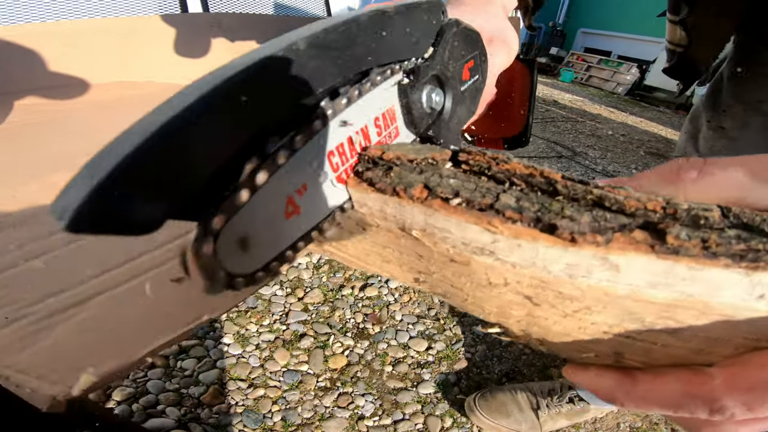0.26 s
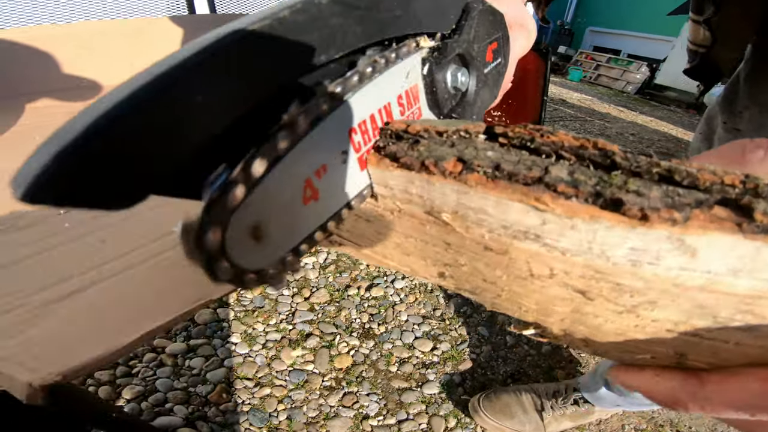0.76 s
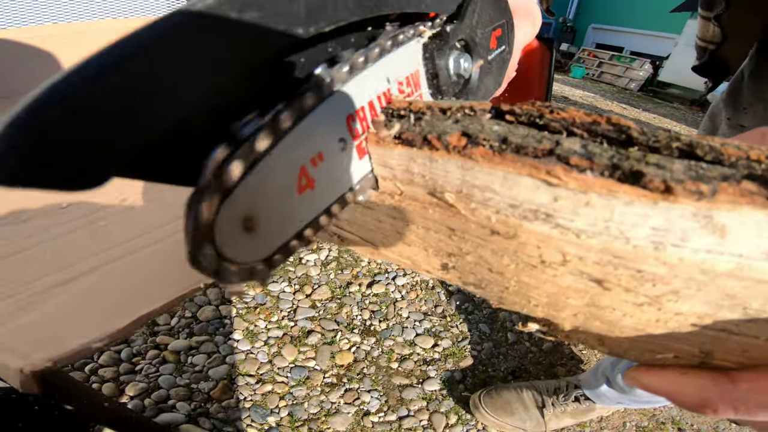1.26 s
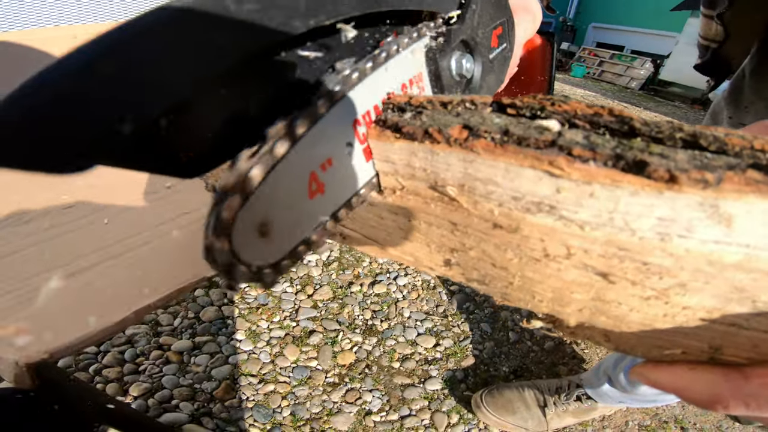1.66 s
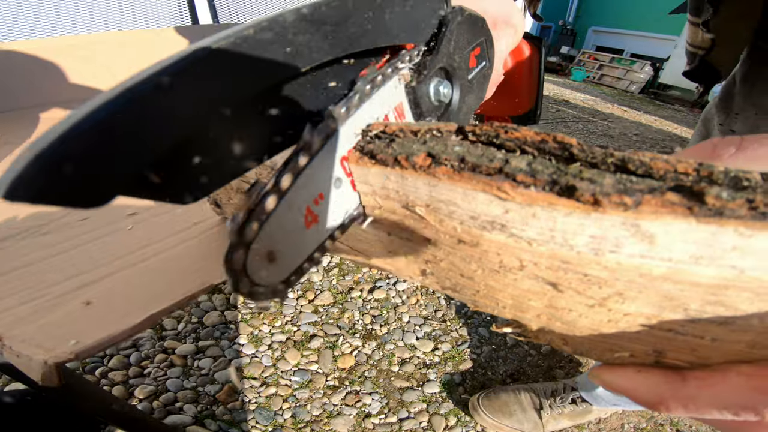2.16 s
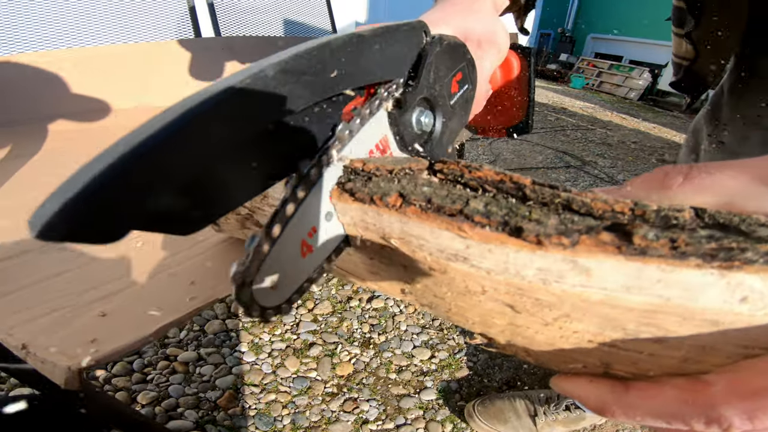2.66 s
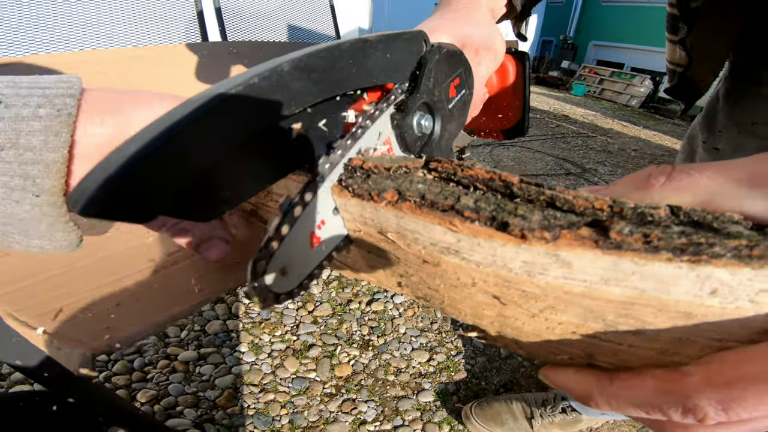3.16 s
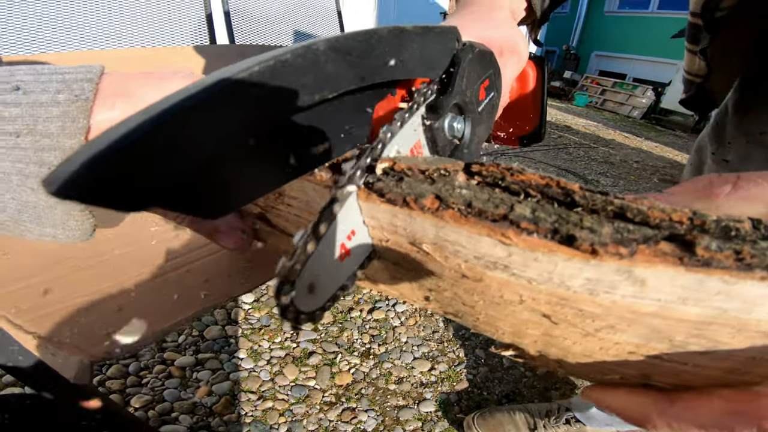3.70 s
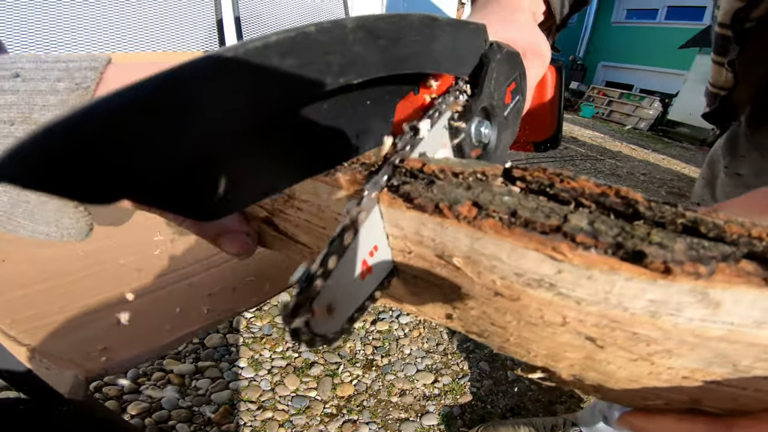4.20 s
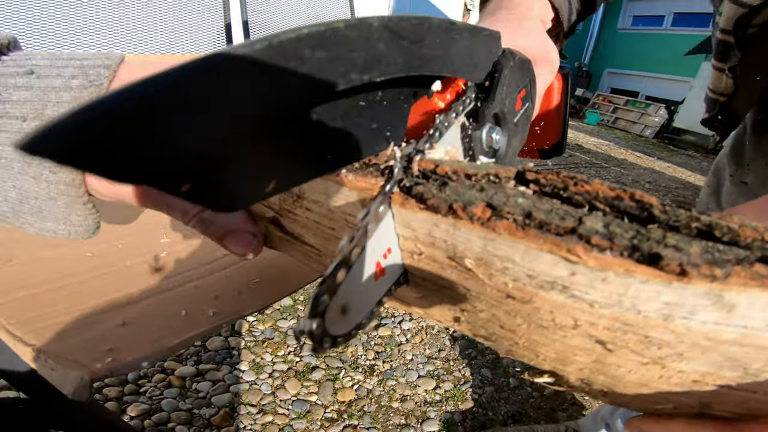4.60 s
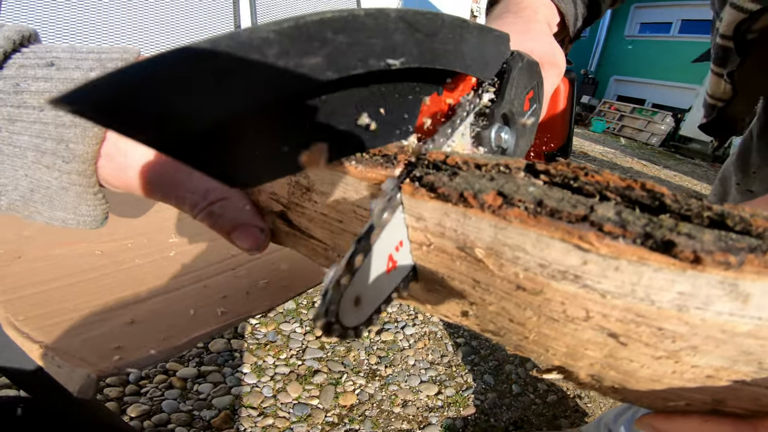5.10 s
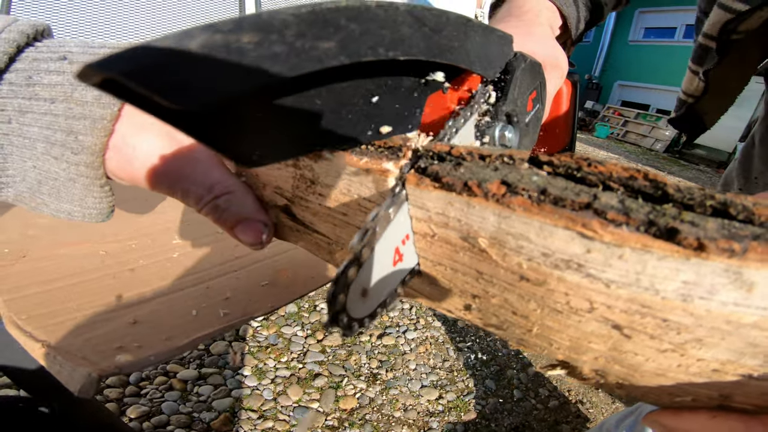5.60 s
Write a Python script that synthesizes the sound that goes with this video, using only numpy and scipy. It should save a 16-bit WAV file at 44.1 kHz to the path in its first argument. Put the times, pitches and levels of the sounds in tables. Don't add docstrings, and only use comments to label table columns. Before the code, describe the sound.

A small battery chainsaw chews steadily through a hand-held log outdoors, rough buzzing rasp and fuzzy whine, very close and dry.

```python
import sys
import numpy as np
from scipy import signal
from scipy.fft import rfft, irfft, next_fast_len
from scipy.io import wavfile
from scipy.ndimage import uniform_filter1d, minimum_filter1d, map_coordinates

SR = 44100
rng = np.random.default_rng(int(sys.argv[2]) if len(sys.argv) > 2 else 0)


def to_wav(sig):
    pcm = np.clip(np.atleast_2d(sig), -1, 1) * 32767
    pcm = np.round(pcm).astype(np.int16)
    wavfile.write(sys.argv[1], SR, pcm.T)


def ratio_of_db(decibels):
    return 10 ** (np.asarray(decibels, float) / 20)


N = 257984
CUTTERS_HZ = 43

# time_s, lead_cutters
CHAIN_LEAD = [(0, 0.75), (0.1, 0.15), (0.35, 1.05), (0.45, 0.65), (1.1, -0.35), (1.25, -1.2), (1.95, -2.0),
              (2.25, -0.85), (2.85, -1.35), (3.35, -3.05), (3.8, -2.5), (4.25, -3.25), (4.75, -2.6),
              (4.95, -3.35), (5.15, -2.4), (5.35, -2.65), (5.7, -2.2), (5.85, -1.45)]
# onset_s (each peaks about 3 ms later), level_db, ring_hz
HARD_BITES = [(0.0553, -8, 2070), (0.114, -16, 2620), (0.1531, -6, 2460), (0.1984, -2, 2820),
              (0.2413, -14, 2450), (0.2809, -18, 2760), (0.3217, -8, 1950), (0.3721, -15, 2090),
              (0.4226, -17, 2720), (0.5759, -7, 2440), (0.6354, -5, 2430), (0.81, -13, 2680),
              (0.831, -3, 2470), (1.3321, -20, 2400), (2.394, -2, 2410), (2.4628, -4, 1980),
              (2.511, -4.5, 2130), (2.5386, -3, 2160), (2.5834, -3, 2060), (2.6282, -4, 2070),
              (2.7274, -4.5, 2510), (2.7923, -1, 2420), (3.0225, -2, 2380), (3.1697, -3, 2440),
              (3.196, -4, 2380), (3.2235, -9, 2370), (3.503, -7, 2080), (4.3505, 0, 2240),
              (5.1711, -1, 2430), (5.263, -3, 2270)]
# time_s, push_db
BAR_PUSH = [(0, 0.5), (.4, 1.5), (.65, 2), (.9, 0.5), (1.25, -2), (1.6, 0), (2, 0.5), (2.4, -1),
            (2.62, -4.5), (2.9, 0), (3.5, -0.5), (4.24, 1), (4.44, -0.5), (4.9, 1), (5.24, -2), (5.45, 0.5),
            (5.85, -1.5)]
# deep_db, shallow_change_db, per_push_db, settle_s
LAYER_LEVELS = [
    (-31.5, 5, .5, 2.25),
    (-33, 5, 0.37, 1.77),
    (-22, 4, 1, 0.49),
    (-29, -4, 0.35, 4.9),
]
# pitch_hz, density_db
TEAR_COLOURS = [
    [(880, -22), (1500, -23), (1870, -6), (2250, -10), (2390, -6), (2820, -4.5), (3310, -10), (3670, -17.5), (4110, -32), (4400, -37), (5720, -27), (9680, -120)],
    [(880, -50.5), (1500, -21), (1760, -9), (1990, 1), (2410, -3.5), (2540, -3.5), (2840, -5.5), (3310, -8), (3790, -8), (4060, -13.5), (4400, -39.5), (5720, -74), (9680, -120)],
]
# time_s, pitch_hz, share_of_tearing_db
GEAR_WHINE = [(0, 2470, -12), (1.5, 2530, -21), (2.3, 2520, -8.5), (2.6, 2420, -9), (2.75, 2500, -6),
              (3, 2420, -15), (3.4, 2420, -12), (3.65, 2500, -4.5), (3.85, 2330, -3), (4.12, 2320, -6),
              (4.3, 2520, -7), (4.5, 2650, -17), (4.78, 2580, -9), (5.03, 2670, -9.5), (5.25, 2450, -8.5),
              (5.45, 2525, -6), (5.62, 2440, -7), (5.85, 2500, -2.5)]
# pitch_hz, density_db
FIZZ_COLOURS = [
    [(2470, -3.5), (4200, -9.5), (4640, -7), (4920, -1.5), (5800, -22.5), (6660, -7.5), (7030, -8), (8020, -9), (8850, -21), (9300, -14), (10300, -17), (12900, -16.5), (15600, -29)],
    [(2470, -9), (4200, -6.5), (4490, -9), (5400, -5), (6060, -7), (7150, -1.5), (8150, -11), (8660, -7), (9000, -4.5), (9560, -10), (10800, -25), (12400, -19), (15600, -35)],
]
# pitch_hz, density_db
LOG_COLOUR = [(180, -25), (300, -4), (350, -9.5), (426, 1.5), (476, 0.5), (609, -9), (653, -9), (720, 1.5),
              (772, 2), (1040, -6), (1600, -7), (2080, -27), (3520, -120)]
# pitch_hz, density_db
THUMP_COLOURS = [
    [(32, -37), (55, -6.5), (194, 1), (253, -1), (314, -17.5), (350, -8.5), (460, -52), (770, -120)],
    [(26, -42), (45, -8), (59, -2), (86, 0), (113, -3), (199, -4.5), (350, -19.5), (460, -49), (770, -120)],
]
# centre_s, half_length_s, extra_db
LOG_JOLTS = [(0.047, 0.13, 5.5), (0.627, 0.081, 4), (0.944, 0.11, 6.5), (2.4, 0.097, 2.5),
             (3.05, 0.09, 1.5), (4.002, 0.17, 0.5), (5.225, 0.19, 1)]
# pitch_hz, saw_near_db, saw_leaning_away_db
STEREO_WIDTH = [(40, -15, -5.5), (336, -17, -16.5), (860, -12.5, -9.5), (1120, -8.5, -4.5),
                (1720, -5.5, -4), (1930, -4.5, -12.5), (2310, -13.5, -21), (2950, -13.5, -10.5),
                (4250, -13.5, -13), (5600, -4, -7), (7050, 0, 1.5), (9200, 0, -5), (10600, -1.5, -3),
                (15000, 0, -7)]
# pitch_hz, share_of_side_tied_to_mid (0-1), phase_rad, opening_s
MIC_PORTS = [(80, .6, 3.1, .9), (350, .5, 2.7, .7), (700, .25, 3.5, .6), (1300, .3, .7, .5),
             (2100, .7, .3, .3), (3000, .65, 0, .7), (4000, .6, 0, .5), (5000, .25, .5, .4),
             (7000, .7, 1.7, .15), (8000, .55, 1.3, .15), (10000, .5, 1.7, .2), (12500, .6, .4, .2)]


def unit(x):
    return x / np.sqrt(np.mean(x ** 2) + 1e-20)


def along(points, hz):
    f, *cols = np.transpose(points)
    return np.squeeze([np.interp(np.log(hz + 1), np.log(f + 1), c) for c in cols])


def curves(rows):
    s, *cols = np.transpose(rows)
    return [np.interp(np.arange(N) / SR, s, c) for c in cols]


def wobble(rate):
    knots = rng.standard_normal(int(N * rate / SR) + 4)
    return map_coordinates(knots, [np.arange(N) * rate / SR])


def coloured(x, spectrum):
    m = 2 * next_fast_len(N // 2 + 4096)
    gain = ratio_of_db(along(spectrum, np.fft.rfftfreq(m, 1 / SR)))
    cepstrum = irfft(np.log(gain + 1e-4), m)
    cepstrum[1:m // 2] *= 2
    cepstrum[m // 2 + 1:] = 0
    return unit(irfft(rfft(x, m) * np.exp(rfft(cepstrum)), m)[..., :N])


def recolouring(x, pair, start, end):
    depth = np.pi / 2 * np.interp(np.arange(N) / SR, [start, end], [0, 1]) ** 2
    first_colour, second_colour = coloured(x, pair[0]), coloured(x, pair[1])
    return np.cos(depth) * first_colour + np.sin(depth) * second_colour


def bumps(times, sizes, rise, fall):
    t = np.arange(-1200, 1201) / SR
    train = np.bincount(np.clip(times * SR, 0, N - 1).astype(int), sizes, N)
    swell = np.exp(-.5 * (t / np.where(t < 0, rise, fall)) ** 2)
    return np.abs(signal.fftconvolve(train, swell, "same"))


def passed():
    return np.maximum.accumulate(CUTTERS_HZ * np.arange(N) / SR + curves(CHAIN_LEAD)[0])


def bites():
    times = np.interp(np.arange(-2, 260), passed(), np.arange(N) / SR, -1, -1)
    luck = rng.standard_normal((len(times), 2))
    times = times + .0012 * luck[:, 0]
    db = 1.4 * luck[:, 1]
    db -= 7 * ((times > .1) & (times < .31))
    hard_s = np.transpose(HARD_BITES)[0]
    near = np.abs(times[:, None] - hard_s - .002).argmin(0)
    times[near], db[near] = hard_s + 0.00304, 3
    return times[times > 0], ratio_of_db(db[times > 0])


def chips():
    luck = rng.random((900, 2))
    return unit(bumps(luck[:, 0] * N / SR, ratio_of_db(4.4 * luck[:, 1]), 0.00051, 0.00063))


def effort():
    deep_db, shallow_db, per_push, settle_s = np.transpose(LAYER_LEVELS)[:, :, None]
    shallow = np.exp(-(np.arange(N) / SR / settle_s) ** 2)
    db = deep_db + shallow_db * shallow + per_push * curves(BAR_PUSH)[0]
    return db[0] + jolts(), *db[1:]


def rubbing():
    return np.interp(np.arange(N) / SR, [.7, 1.8], [.6, 1])


def scraping(teeth, snaps, late, rise, fall, rest, snappy):
    load = (rest + bumps(teeth[0] + late, teeth[1], rise, fall)) * (1 + snappy * snaps)
    drift = ratio_of_db(0.45 * wobble(8) + 0.86 * wobble(21.054))
    return unit(load * drift * rng.standard_normal((2, N)))


def tear(teeth, snaps):
    torn = scraping(teeth, snaps, 0, 0.0044, 0.0018, rest=1.54 * rubbing(), snappy=0.34)
    return recolouring(torn, TEAR_COLOURS, 0.11, 1.74) * 0.78


def whine(teeth):
    hz, share_db = curves(GEAR_WHINE)
    load = .6 + bumps(*teeth, .005, .003)
    turn = 2 * np.pi * np.cumsum(hz + 30 * wobble(40)) / SR
    fuzz = [wobble(110) * np.cos(turn) + wobble(110) * np.sin(turn) + 1.2 * np.cos(turn) for _ in "ab"]
    return ratio_of_db(share_db) * unit(load * np.array(fuzz))


def rings(s, db, hz, rise):
    steps = np.arange(-500, 400)
    t = steps / SR
    s, db, hz = s[:, None], db[:, None], hz[:, None]
    swell = np.exp(-.5 * (t / np.where(t < 0, rise, 0.56 * rise)) ** 2)
    cycles = hz * t * (1 - 3 * t) + rng.random(s.shape)
    tone = ratio_of_db(db) * swell * np.sin(2 * np.pi * cycles)
    at = np.abs(np.round(s * SR).astype(int) + steps)
    return np.bincount(at.ravel(), tone.ravel(), N + 900)[:N] * [[1], [.6]]


def clangs(teeth):
    times, strength = teeth
    at = (times * SR).astype(int) % N
    luck = rng.random((len(times), 5))
    _, log_db, tear_db, _ = effort()
    spread = np.interp(times, [.8, 1.8], [.35, .1])
    bar_hz = np.where(luck[:, 0] < .5, 2050, curves(GEAR_WHINE)[0][at]) * (0.946 + spread * luck[:, 1])
    bar_db = tear_db[at] + 20 * np.log10(strength) + 1.4 * luck[:, 2]
    hard_s, hard_db, hard_hz = np.transpose(HARD_BITES)
    usual = np.abs(times[:, None] - hard_s).min(1) > .005
    bar = rings(times[usual], bar_db[usual], bar_hz[usual], 0.0037)
    knock = rings(times + .004, log_db[at] - 4 + 12 * luck[:, 3], 710 + 190 * luck[:, 4], .0035)
    return bar + knock + rings(hard_s + .003, hard_db - 10.5, hard_hz, 0.0021)


def fizz(teeth, snaps):
    spray = scraping(teeth, snaps, -0.00091, 0.0054, 0.0036, rest=1.53 * rubbing(), snappy=0.33)
    return recolouring(spray, FIZZ_COLOURS, 0.1, 1.4) * 1.25


def log_ring(teeth, snaps):
    scraped = scraping(teeth, snaps, 0.00072, 0.006, 0.0036, rest=0.87 * rubbing(), snappy=0.34)
    return coloured(scraped, LOG_COLOUR)


def thump(teeth, snaps):
    pull = -unit(bumps(teeth[0] - .0025, teeth[1] ** 1.5, .001, .001))
    rumble = scraping(teeth, snaps, 0.0013, 0.0055, 0.0043, rest=0.94, snappy=0.28)
    shaken = np.array([0.38 * pull, 0 * pull]) + 3 * rumble
    return recolouring(shaken, THUMP_COLOURS, 0.19, 1.98) * 0.94 * ratio_of_db(0.26 * wobble(9.9))


def jolts():
    s, half, db = np.transpose(LOG_JOLTS)[:, :, None]
    return (db * np.exp(-.5 * ((np.arange(N) / SR - s) / half) ** 2)).sum(0)


def sway():
    loose_db = 7 * np.exp(-np.arange(N) / SR / 1.9)
    db = -31.5 + loose_db + 0.38 * jolts()
    drift_db = -7.0 + 3.7 * wobble(11) + 2.5 * wobble(2.95)
    return ratio_of_db(db + drift_db) * np.cos(2 * np.pi * (passed() - .03)) * [[1], [.6]]


def scene():
    teeth, snaps = bites(), chips()
    thump_db, log_db, tear_db, fizz_db = effort()
    saw = ratio_of_db(tear_db) * (tear(teeth, snaps) + whine(teeth)) + clangs(teeth)
    spray = ratio_of_db(fizz_db) * fizz(teeth, snaps)
    log = ratio_of_db(log_db) * log_ring(teeth, snaps) + ratio_of_db(thump_db) * thump(teeth, snaps)
    return saw + spray + log + sway()


def limited(x):
    need = np.minimum(1, .62 / (np.abs(x).max(0) + 1e-9))
    return x * uniform_filter1d(minimum_filter1d(need, size=181), size=91)


def stereo(dry):
    hz, t, (mid, twin) = signal.stft(dry, SR, nperseg=512)
    tied, turn, opening_s = along(MIC_PORTS, hz)[:, :, None]
    lean = np.interp(t, [2.2, 3.6], [0, 1])
    tied = np.clip(tied * (1 - 0.26 * lean * (hz[:, None] < 5500)), 0, 1)
    near_db, away_db = along(STEREO_WIDTH, hz)[:, :, None]
    side_db = near_db + (away_db - near_db) * lean
    opened = 1 - np.exp(-np.maximum(t - .55, 0) / opening_s) + 0.074
    opened[hz > 11300] = 1.0
    side = opened * ratio_of_db(side_db) * (tied * np.exp(1j * turn) * mid + np.sqrt(1 - tied ** 2) * twin)
    side = signal.istft(side, SR, nperseg=512)[1][:N]
    return np.array([dry[0] + side, dry[0] - side])


def top_cut(x):
    return signal.sosfilt(signal.butter(12, 15720, fs=SR, output="sos"), x)


def record(dry):
    mix = limited(stereo(dry))
    return top_cut(mix)


dry = scene()
out = record(dry)
to_wav(out)
```